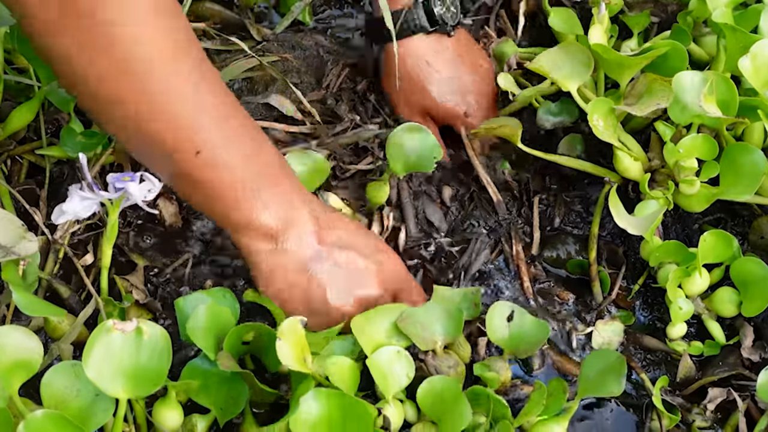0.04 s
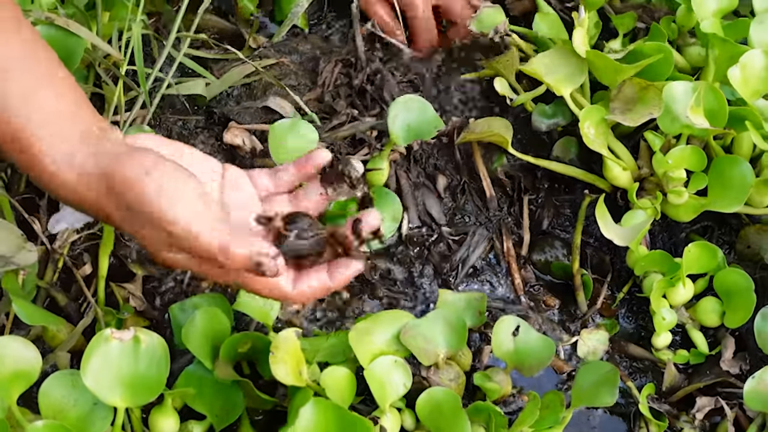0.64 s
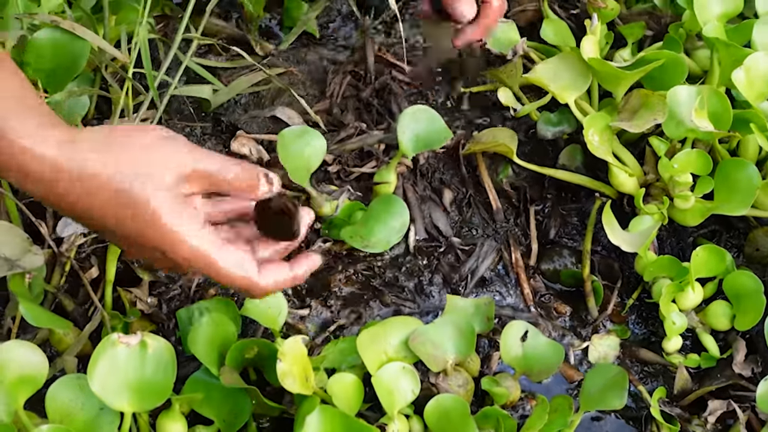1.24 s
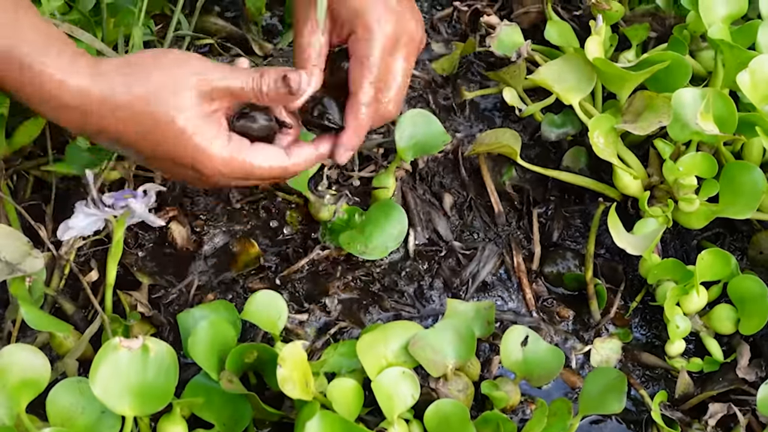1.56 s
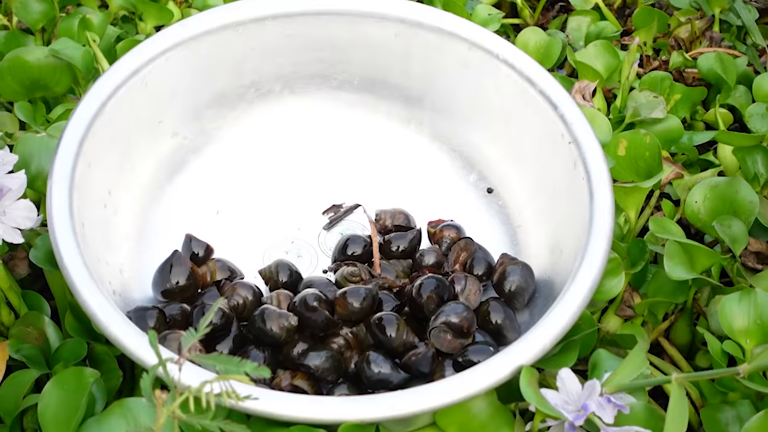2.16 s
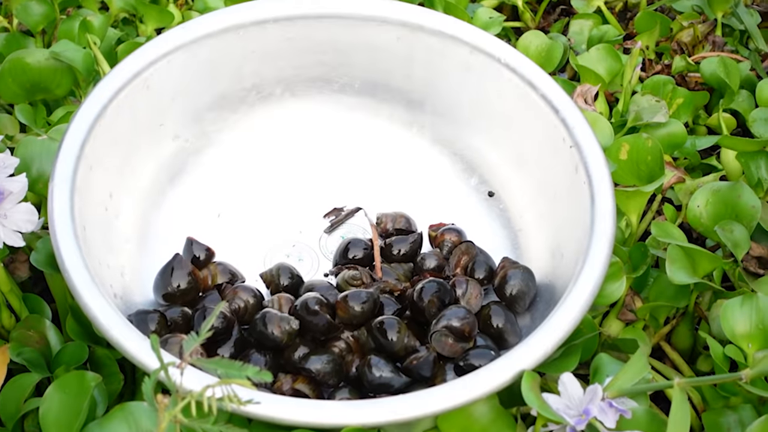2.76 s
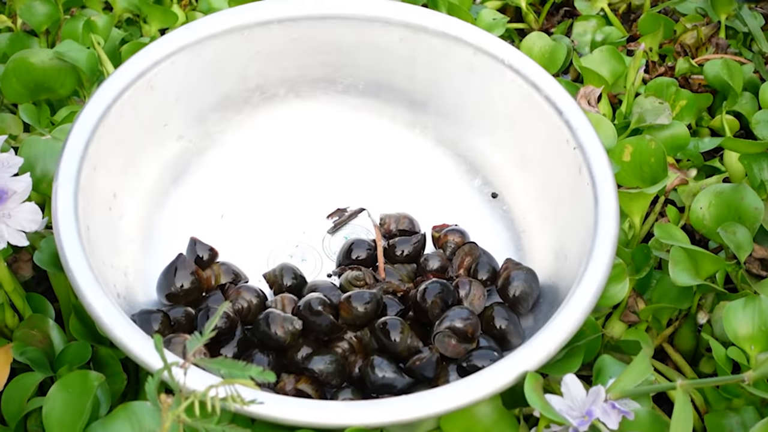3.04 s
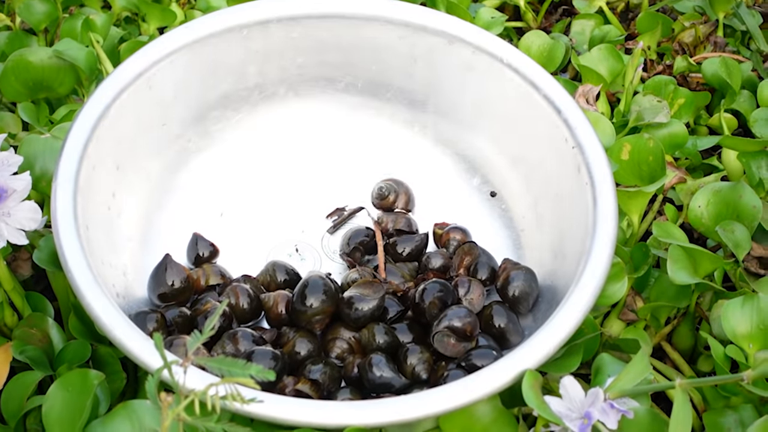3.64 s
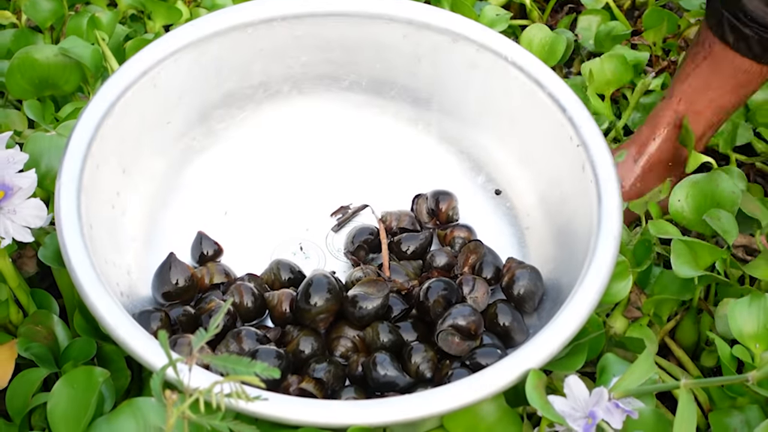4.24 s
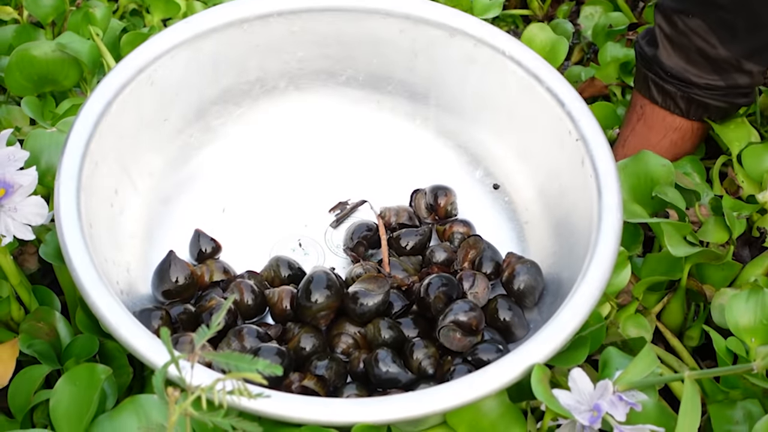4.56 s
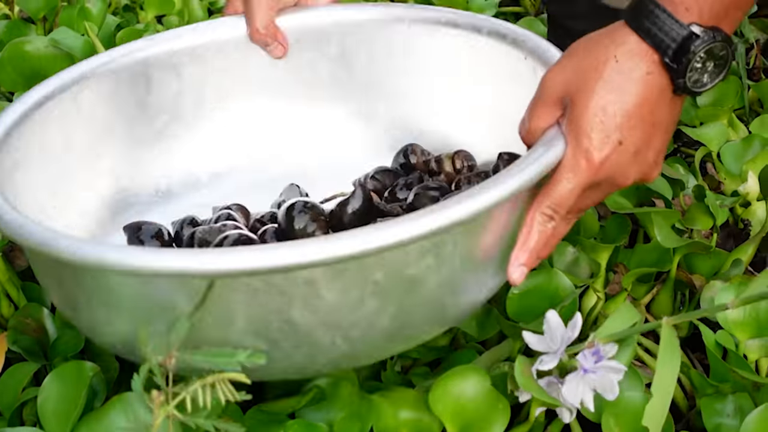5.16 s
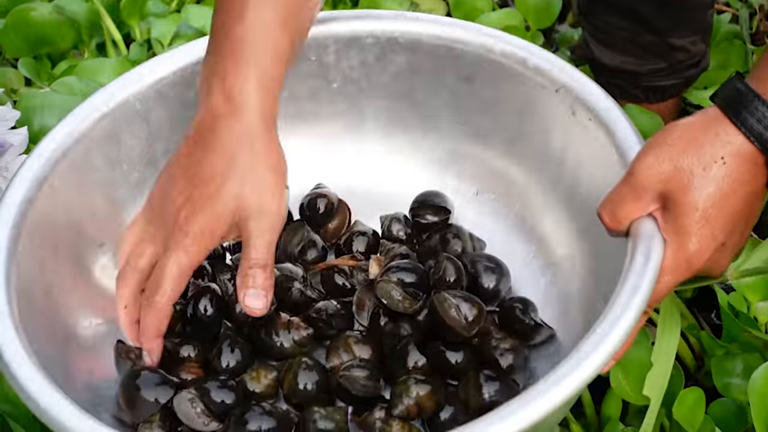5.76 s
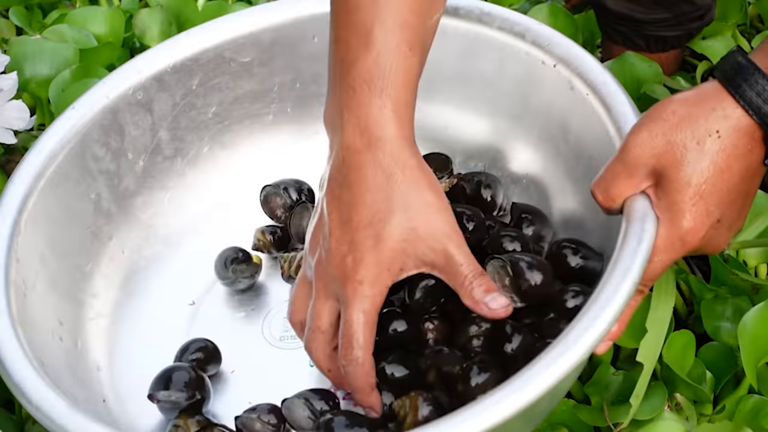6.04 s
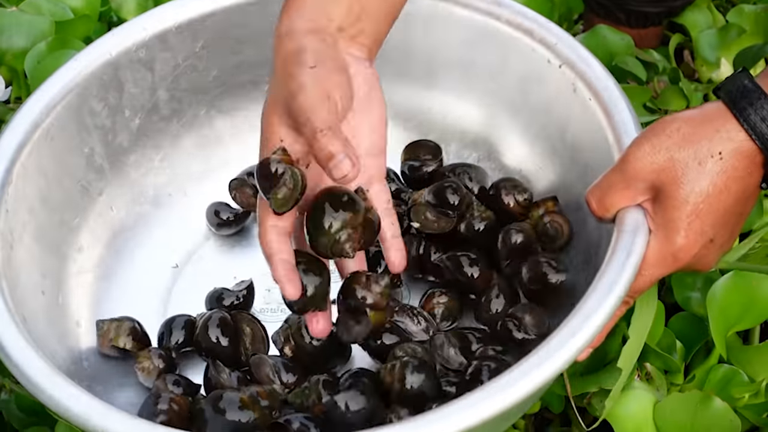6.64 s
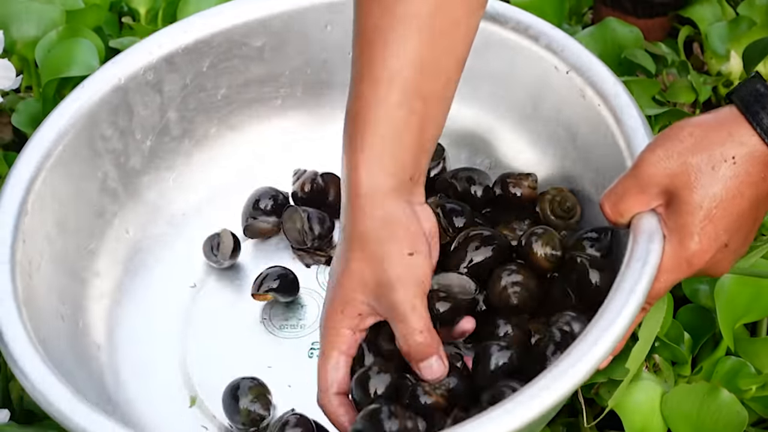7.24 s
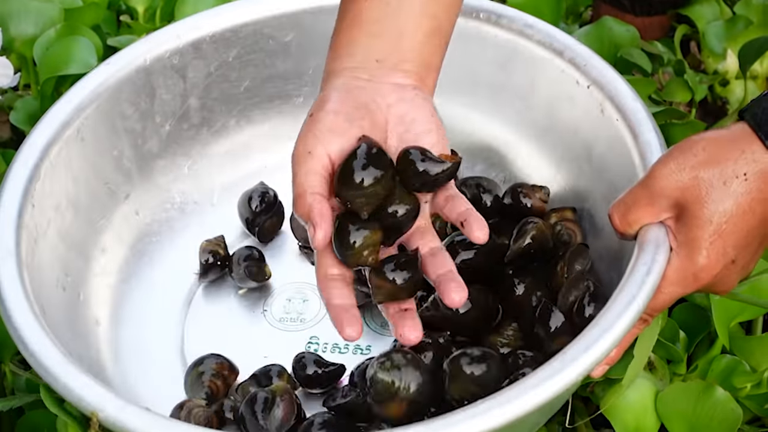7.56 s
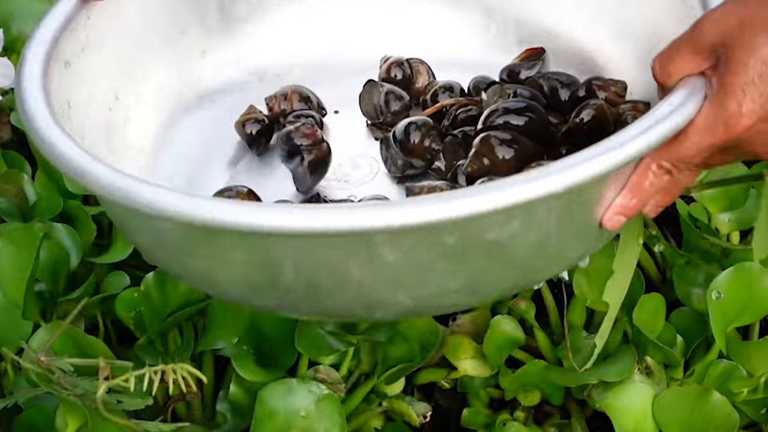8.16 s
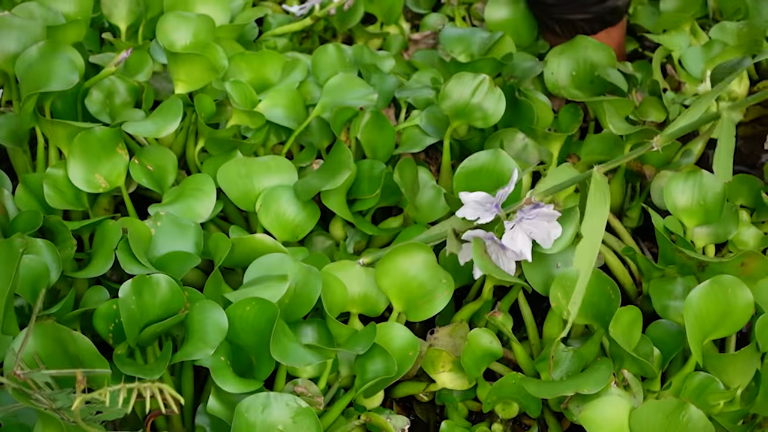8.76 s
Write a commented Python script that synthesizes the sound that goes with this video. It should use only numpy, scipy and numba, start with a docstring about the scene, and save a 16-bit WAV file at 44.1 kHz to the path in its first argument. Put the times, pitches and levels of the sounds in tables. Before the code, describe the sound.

Outdoors, fingers dig softly through wet mud with small squelches and pops while a cricket trills and a katydid buzzes. A handful of hard snail shells then drops into a metal basin, and leaves rustle. The basin is lifted, shaken and stirred by hand, making a loud, dense clatter of shells that tumble, scrape and roll on the metal. It ends with a few dull bumps. The sound is close and nearly mono.

```python
"""Snails clatter into a metal basin, which is then lifted, shaken and stirred by hand.
Each contact cracks, rings a hollow shell and knocks the damped metal; the heap tumbles, slides and rolls.
Before that, fingers pick the snails from wet mud among water plants, and small cavities pop open.
Leaves rustle, and a cricket, a katydid and an insect chorus sing behind in the open air.
The sound is close and nearly mono, with a fast limiter flattening the clatter."""
import sys
import numpy as np
from scipy import signal
from scipy.fft import rfft, irfft
from scipy.io import wavfile
from scipy.ndimage import uniform_filter1d, minimum_filter1d
from numba import njit

SR = 44100
rng = np.random.default_rng(int(sys.argv[2]) if len(sys.argv) > 2 else 0)


def int16_out(signal):
    """Quantize to a 16-bit WAV file."""
    q = np.round(np.clip(np.atleast_2d(signal).T, -1, 1) * 32767)
    wavfile.write(sys.argv[1], SR, q.astype(np.int16))


N = 387638
TIME = np.arange(N) / SR
HIT_TIME = np.arange(SR // 7) / SR  # seconds within one hit
LEAVE_MUD_S, LIFT_S = 1.87, 4.9  # the digging ends; the basin comes off the ground

# The tone of a shell strike. Each row: frequency in Hz, gain in dB.
SHELL_COLOUR = [(80, -44), (190, -15.5), (323, -3.8), (527, -5.5), (718, -3.8), (917, -7), (1090, -3.2),
                (1430, -4.5), (2180, 0), (3960, -2.5), (7700, -11.8), (16000, -23.5)]
# The tone of wet mud. Each row: frequency in Hz, gain in dB.
MUD_COLOUR = [(80, -60), (240, -37), (400, -36), (1070, -14), (1490, -9.5), (2120, -3), (16000, -7)]


def contact(shell_hz, ring_db, lifted, rim_db=0):
    """One blow: a chattering crack, a hollow shell and the basin, whose modes shift with spot and load."""
    # The loaded basin's modes. Each row: pitch in Hz, level in dB on the ground and lifted, t60 in seconds.
    basin_modes = [(371, -22, -23.5, .09), (708, -18, -18.3, .029), (1090, -20.5, -18, .042),
                   (1480, -21, -25, .03), (1760, -22, -20.5, 0.025), (2050, -26, -20, .04),
                   (2310, -20.5, -22.5, 0.059), (2680, -25, -23, 0.048), (3850, -23, -23.5, 0.08)]
    # The rim's modes, which ring on once the basin is lifted. Each row: pitch in Hz, level in dB.
    rim_modes = [(1115, -28), (1432, -32), (1560, -32), (1707, -30), (2003, -28), (2266, -33), (2536, -31)]
    spot, load = rng.standard_normal((2, len(basin_modes)))
    weights = rng.choice([-1, 1], len(basin_modes)) * undb(2.5 * spot)
    tunings = 1.04 + .03 * load if lifted else 1 + .014 * load  # lifting raises the modes
    basin = sum(weight * undb(lifted_db if lifted else ground_db) * ring(hz * tuning, t60)
                for weight, tuning, (hz, ground_db, lifted_db, t60) in zip(weights, tunings, basin_modes))
    boom = undb(-17.5) * ring(rng.uniform(260, 500), t60=.05)  # off the ground the bottom swings freely
    rim = sum(rng.choice([-1, 1]) * undb(db + rim_db)
              * ring(hz * (1 + .022 * rng.standard_normal()), t60=.35) for hz, db in rim_modes)
    chatter = 1 + .9 * np.exp(-((HIT_TIME - rng.uniform(.003, .0089)) / .0018) ** 2)  # a second touch
    hard = undb(-7.5) * crack(t60=.0031) + undb(-1.5) * chatter * crack(t60=.035)
    hard += undb(-10.5) * crack(t60=.19)
    hollow = undb(ring_db) * ring(shell_hz, t60=.032)
    ping = undb(-15) * ring(rng.uniform(3827, 9500), t60=.03)  # the thin shell wall
    onset = 1 - np.exp(-HIT_TIME / .0004)  # a rounded shell takes a moment to bear on the metal
    return (hard + hollow + ping + basin + lifted * (boom + rim)) * onset


def knocks():
    """Single shells land, bounce and strike the wall and each other."""
    # Each row: start in seconds, relative level in dB, shell pitch in Hz, shell ring in dB,
    # brightness in dB per octave.
    strikes = [(3.297, -22, 2380, -11, 3), (3.362, -8.5, 2240, -18, 1), (3.404, -13.5, 3600, -12, -1),
               (3.434, -15, 1290, -7, -3.5), (3.446, -16, 1130, -7, 0), (3.474, -18, 2570, -17, -2),
               (3.486, -14.5, 3880, -1, -1), (3.504, -12.5, 2320, -5, 1.5), (3.52, -17, 2280, -10, -1),
               (3.557, -13, 2240, -7, -0.5), (3.601, -14.5, 2350, -0.5, -2), (3.638, -8, 1880, -17, 0.5),
               (3.682, -14, 2360, -22, 0), (3.697, -23, 2300, -12, -1), (3.71, -11.5, 2420, -15, 0.5),
               (3.734, -23, 2400, -14, 0), (3.778, -14, 3070, -22, -1.5), (3.795, -24, 2310, -10, -2),
               (3.902, -24, 2380, -9, 2), (3.921, -13, 3080, -19, -1), (3.952, -14, 4330, -17, 1.5),
               (3.963, -21, 2300, -12, -3), (3.98, -17.5, 2280, -6, -0.5), (4.126, -24, 2040, -15, -1.5),
               (4.997, -15, 2440, -14, 5), (5.014, -14, 2140, -8.5, 0), (5.042, -21, 2300, -14, 2.5),
               (5.111, -15, 2200, -3, -2), (5.116, -17, 2300, -1, -2), (5.162, -15, 2300, -7, 0),
               (5.585, -11, 2600, -12, -1.5), (5.616, -8, 3400, -12, 3), (5.638, -10, 2980, -13, 1),
               (5.657, -9, 4100, -13, 2), (5.718, -7, 4050, -11, 3.5), (5.752, -14, 2200, -14, 3),
               (5.798, -13, 2500, -15, 0), (5.817, -12.5, 2110, -10, 1), (6.184, -9, 3150, -7, 0),
               (6.222, -7, 3000, -15, 1), (6.464, -9, 3600, -14, 1.5), (6.486, -11, 1590, -12, 0),
               (6.503, -8, 3100, -14, 0), (6.536, -8, 2180, -13, 0), (6.588, -10, 3400, -15, 0),
               (6.619, -6, 2150, -13, 0), (6.629, -8, 2150, -11, 2), (6.647, -9, 2130, -10, 1),
               (6.694, -11, 800, -11, 2), (6.721, -12.5, 2790, -11, 0), (6.757, -9, 1720, -13, 2),
               (6.779, -14, 2222, -14, 2), (6.792, -6, 2490, -21, -1), (6.889, -11, 2510, -13, 2),
               (6.919, -11, 1760, -13, 0), (6.936, -11, 2140, -11, 1), (6.968, -7, 3940, -12, 5),
               (7.012, -9, 3380, -14, 0), (7.047, -11, 2280, -13, 1), (7.071, -10, 2020, -13, 1),
               (7.109, -11, 1940, -9, 0), (7.363, -9, 2040, -14, 0), (7.392, -3.5, 4008, -12, 1),
               (7.417, -6, 2165, -12, 0), (7.464, -12, 3420, -13, 0), (7.474, -7, 3500, -11, 0),
               (7.539, -4, 2000, -18, 1), (7.576, -3.5, 2480, -13, 1), (7.615, -9, 3330, -14, 1),
               (7.667, -9, 2780, -9, 1), (7.681, -8, 3865, -15, 0.5), (7.709, -15, 1905, -17, 0),
               (7.746, -14, 2044, -16, -0.5), (7.772, -23, 2600, -12, 3), (7.781, -8, 2360, -12, 0),
               (7.789, -14, 1850, -8, -1), (7.821, -8, 2330, -15, -1), (7.964, -8, 3260, -7, -0.5),
               (7.977, -5, 2700, -17, 2.5), (8.014, -13, 2660, -10, -2), (8.054, -15, 1935, -9, -1),
               (8.073, -6.5, 2270, -16, 0.5), (8.111, -19, 2300, -14, 0), (8.215, -27, 2300, -12, 0),
               (8.252, -31, 2300, -10, -2), (8.306, -16, 2330, -14.5, -0.5), (8.328, -25, 2500, -14, -0.5),
               (8.345, -33, 1650, -10, -2)]
    carry_s = 8.06  # from here the basin is held only by its edge and rings more freely
    out = np.zeros(N)
    for s, db, hz, ring_db, tilt in strikes:
        hit = contact(hz, ring_db, lifted=s > LIFT_S, rim_db=5 * (s > carry_s))
        add(out, s, undb(db) * set_energy(colour(hit, SHELL_COLOUR, tilt), ring_s=.0016))
    return out


def shells(lifted, count=90):
    """A palette of blows from shells that differ in size, hollowness and hardness."""
    hits = []
    for pitch, hollow, hardness in np.clip(rng.standard_normal((count, 3)), -2, 2):
        hz = np.clip(2650 * 2 ** (.48 * pitch), 1600, 9000)
        hit = contact(hz, ring_db=-10 + 3.5 * hollow, lifted=lifted)
        hits.append(colour(hit, SHELL_COLOUR, tilt=.096 + 1.58 * hardness))
    return hits


def heap():
    """A handful pours in; later the shells tumble, with more contacts the harder they are shaken."""
    # Falling shells, a shake or a sweep of the hand set the heap tumbling.
    # Each row: start, push length and settling time in seconds, relative level in dB.
    tumbles = [(3.42, .05, .03, -35), (3.68, .04, .06, -42), (4.905, .09, .06, -39.5), (4.99, .15, .1, -37),
               (5.152, .1, .1, -25.5), (5.23, .33, .2, -23.7), (5.835, .28, .3, -23.3),
               (6.215, .22, .3, -24.3), (6.785, .075, .06, -23), (6.96, .15, .1, -27.8),
               (7.12, .2, .1, -24.7), (7.53, 0.072, .12, -25.5), (7.825, .115, 0.06, -24),
               (8.07, .02, .025, -30), (8.13, .3, .02, -47)]
    # A handful hits the basin all at once: one row with the same columns.
    pour = (3.296, .04, .07, -27.5)
    motion = np.maximum(pushes([pour], attack_s=.002), pushes(tumbles))
    shake_rate = 160 + 480 * np.minimum(motion / undb(-23), 1.25)
    poured = impacts(rate=900, spread_db=2) * (TIME <= LIFT_S)
    shaken = impacts(shake_rate, spread_db=4.2) * (TIME > LIFT_S)
    clatter = scatter(poured, shells(lifted=False)) + scatter(shaken, shells(lifted=True))
    stirring = (TIME > 5.85) & (TIME < 7.6)
    wet = rustle(MUD_COLOUR, rate=230, spread_db=35, slide_db=-16) * stirring  # films tick between fingers
    return motion * (undb(1) * even(clatter, window_s=.045) + undb(-14) * even(wet, window_s=.19))


def sliding():
    """Shells scrape along the tilted wall and under the palm, and the basin hums with them."""
    # Each row: start, push length and settling time in seconds, level in dB.
    slides = [(5.17, .53, .06, -31), (5.755, .022, .025, -34), (5.822, .05, .05, -29), (6.3, .33, .05, -30),
              (7.02, .68, .05, -32), (7.83, .17, .04, -30)]
    # The scrape and the wall's hum. Each row: frequency in Hz, gain in dB.
    slide_colour = [(130, -34), (290, -1), (520, -4), (700, 0), (900, -8), (1150, 1), (1400, -7), (3300, 0),
                    (8000, -13), (16000, -25)]
    scrape = rustle(slide_colour, rate=900, spread_db=4, slide_db=-12)
    return pushes(slides) * even(scrape, window_s=.03)


def rolling():
    """Shells roll and skid over the bare metal: countless small taps keep the bottom ringing."""
    # Each row: start, push length and settling time in seconds, level in dB.
    rolls = [(5.23, .3, .1, -29), (5.85, .33, .06, -27), (7.155, .07, .04, -29)]
    # The bottom's bright clatter. Each row: frequency in Hz, gain in dB.
    roll_colour = [(150, -40), (560, -18), (710, -5), (900, -24), (1400, -20), (1650, -5), (2150, 0),
                   (2950, -1.5), (3600, -7), (6000, -18), (16000, -32)]
    taps = rustle(roll_colour, rate=550, spread_db=4.5, slide_db=-18)
    return pushes(rolls) * even(taps, window_s=.04)


def squelches(cavities=4):
    """A wet film gives way, and a few mud-damped cavities of like size pop open one after another."""
    # Wet clicks of mud, stems and droplets. Each row: start in seconds, relative level in dB,
    # cavity pitch in Hz, cavity ring in dB, brightness in dB per octave.
    clicks = [(0.171, -20.5, 1430, -1, -12), (0.186, -30, 1800, -6, -5), (0.264, -28, 3640, -13, -2),
              (0.381, -29, 1270, 7, -13), (0.551, -32, 1810, -1, -2), (0.573, -30, 1680, -1, -3),
              (0.647, -33, 2700, -2, -1), (0.68, -32.5, 2640, 3, -6), (0.938, -38, 3400, -4, 1),
              (1.16, -34, 2800, 9, 6), (1.201, -33, 2900, -2, -4), (1.248, -30, 2900, -3, -2),
              (1.256, -27, 2070, -1, -4), (1.264, -30, 1900, 0, -5), (1.29, -31, 2300, -3, 0),
              (1.371, -27.5, 2900, -4, -2), (1.42, -34, 3250, -3, -4), (1.468, -29, 5870, -10, -1.5),
              (1.577, -31, 7200, -6, 4), (2.634, -33, 6560, -21, 9), (2.683, -40, 3560, 6, -1),
              (2.705, -35, 2380, 1, -3), (4.799, -45, 1350, 12, -6), (8.426, -36.5, 2270, 0, -9),
              (8.487, -39, 2220, -4, -7.5)]
    onset = 1 - np.exp(-HIT_TIME / .0004)
    out = np.zeros(N)
    for s, db, hz, ring_db, tilt in clicks:
        film = (crack(t60=.003) + crack(t60=.027)) * onset
        pop = colour(film, MUD_COLOUR, tilt)
        pop /= np.linalg.norm(pop)
        for k, (detune, wait) in enumerate(rng.uniform(-1, 1, (cavities, 2))):
            cavity_hz = hz * 2 ** (.35 * detune) if k else hz
            add(pop, k * (.0018 + .0007 * wait), undb(ring_db - 3.5 * k) * bubble(cavity_hz, t60=.018))
        add(out, s, undb(db) * set_energy(pop, ring_s=.00093))
    return out


def bubble(hz, t60, rise_per_s=6):
    """A wet cavity whose ring climbs as it opens."""
    return np.sqrt(2) * fade(t60) * np.sin(2 * np.pi * hz * HIT_TIME * (1 + rise_per_s * HIT_TIME / 2))


def digging():
    """Fingers slide through wet stems, and small pockets of mud suck open under the firmer pushes."""
    # Each row: start and push length in seconds, relative level in dB.
    digs = [(-.02, 0.13, -46), (0.14, 0.34, -45), (0.587, 0.093, -46), (1.185, .1, -45.5),
            (1.352, 0.12, -50), (1.565, 0.13, -53)]
    release_s, rub_db, firm_db = .15, -61, -45.5
    hiss = rustle(MUD_COLOUR, rate=500, spread_db=4.5, slide_db=-6)
    pocket_hz = np.clip(2200 * 2 ** (.5 * rng.standard_normal(60)), 700, 7000)
    suction = scatter(impacts(rate=600, spread_db=4), [ring(hz, t60=.015) for hz in pocket_hz])
    effort = pushes([(s, length, release_s, db) for s, length, db in digs], attack_s=.028, sag_db_per_s=8)
    effort = np.maximum(effort, undb(rub_db))  # between pushes the fingers rub the shells clean
    effort *= TIME < LEAVE_MUD_S
    pull = undb(-53) * (effort / undb(firm_db)) ** 2.1  # suction grows faster than the hiss
    ticks = rustle(MUD_COLOUR, rate=260, spread_db=10, slide_db=-25)  # wet films snap
    friction = undb(1.7) * even(hiss, window_s=.083) + undb(-4) * unit(ticks)
    return effort * friction + pull * even(suction, window_s=.035)


def bumps():
    """Hand, basin and foot bump dully: brief swells of low noise."""
    # Each row: peak time in seconds, level in dB, pitch in Hz, half-width in seconds.
    thuds = [(5.842, -49, 169, 0.021), (6.27, -44.5, 189.7, 0.035), (6.361, -33, 340, 0.04),
             (7.987, -31.5, 324.6, 0.012), (8.087, -33, 328, 0.026), (8.315, -38, 333, 0.013),
             (8.663, -49.5, 407, 0.069)]
    return sum(undb(db) * swell(s, width) * band(hz, hz / 2) for s, db, hz, width in thuds)


def leaves():
    """Feet and basin brush the leaves brightly; underfoot they crush with a duller swish."""
    # Each row: peak time in seconds, level in dB, treble gain in dB, half-width in seconds.
    brushes = [(2.195, -58, -1, .082), (2.44, -59, .5, .13), (3.695, -42, -7, .025), (3.85, -43, -6, .08),
               (4.16, -51, 2, .12), (4.338, -39.5, -4, .035), (4.45, -45, -7.5, .13),
               (8.657, -48.5, -10, .05), (8.65, -57, -5, .2)]
    # The tone of the foliage. Each row: frequency in Hz, gain in dB.
    leaf_colour = [(120, -26), (200, -7.5), (509, -2), (900, -6), (2020, 0.5), (4430, -1), (7270, -3.5),
                   (16000, -13)]
    texture = even(rustle(leaf_colour, rate=400, spread_db=8, slide_db=1.5), window_s=.13)
    dull, bright = (butter(texture, 3, 3500, kind) for kind in ("lowpass", "highpass"))
    return sum(undb(db) * swell(s, width) * (dull + undb(treble_db) * bright)
               for s, db, treble_db, width in brushes)


def cricket():
    """Pairs of wing strokes, each a short whistle that falls in pitch; no two are quite alike."""
    # Each row: start and end in seconds, pitch in Hz, level in dB.
    trills = [(-.008, .25, 4850, -44), (1.081, 1.35, 4850, -45.5), (1.905, 2.02, 4870, -56),
              (2.755, 3.07, 4870, -58)]
    stroke_s, pair_s, warm_up_s = .011, .0413, .07
    t = np.arange(int(stroke_s * SR)) / SR
    out = np.zeros(N)
    for start, end, hz, db in trills:
        for s in np.arange(start, end, pair_s):
            cold = np.exp(-(s - start) / warm_up_s)  # a trill starts flat and soft, then comes up
            for lag in (0, stroke_s):
                detune, strength, fall = rng.standard_normal(3)
                glide = 1 - (.07 + .035 * fall) * (t / stroke_s - .5)
                pitch = hz * (1 - .05 * cold + .01 * detune) * glide
                stroke = np.hanning(len(t)) * np.sin(2 * np.pi * np.cumsum(pitch) / SR)
                add(out, s + lag - stroke_s / 2, stroke * undb(db - 7 * cold + 2.2 * strength))
    return out


def katydid():
    """A high buzz that throbs ten times a second, in two phrases."""
    throb = 1 + .5 * np.cos(2 * np.pi * 10 * (TIME - 2.83))
    phrases = undb(-59) * (TIME < .7) + undb(-63.5) * ((TIME > 1.91) & (TIME < 2.955))
    return phrases * throb * band(9130, width_hz=610)


def outdoors():
    """Moving air and a distant insect chorus, louder at the mud bank than in the field by the basin."""
    # The air over the mud and over the field. Each row: frequency in Hz, gain in dB.
    mud_air = [(30, -21), (161, 2), (449, -7), (937, -7), (2010, -17.5), (3220, -11.5), (3770, -14.5),
               (6900, -9), (11400, -11), (16000, -34.5)]
    field_air = [(30, -43), (59, -6.5), (385, -10.5), (582, -12), (1200, -18.5), (1590, -16.5),
                 (5500, -24.5), (7150, -65), (12100, -120)]
    # The chorus. Each row: centre and width in Hz, level in dB at the mud and in the field.
    insects = [(5120, 300, -69, -72.5), (6730, 590, -82, -67), (7130, 810, -62, -86),
               (11350, 450, -61.5, -78), (11650, 500, -72, -71)]
    at_mud = TIME < LEAVE_MUD_S
    mud = undb(-54) * unit(colour(rng.standard_normal(N), mud_air))
    field = undb(-68) * unit(colour(rng.standard_normal(N), field_air))
    field += undb(-67) * band(8100, width_hz=9900)
    chorus = sum(undb(np.where(at_mud, mud_db, field_db) + .78 * walk(rate=20)) * band(hz, width)
                 for hz, width, mud_db, field_db in insects)
    return np.where(at_mud, mud, field) * undb(.31 * walk(rate=12)) + chorus


def rustle(points, rate, spread_db, slide_db):
    """Tiny slips, rate a second, over a smooth sliding hiss, coloured by (Hz, dB) points."""
    slip_power = signal.oaconvolve(impacts(rate, spread_db) ** 2, fade(t60=.008))[:N]
    envelope = unit(np.sqrt(np.abs(slip_power))) + undb(slide_db)
    return colour(rng.standard_normal(N) * envelope, points)


def impacts(rate, spread_db):
    """Randomly timed impulses of scattered strength, rate a second on average."""
    return (rng.random(N) < rate / SR) * undb(spread_db * np.clip(rng.standard_normal(N), -2, 2))


def scatter(impulses, sounds):
    """Each impulse sets off one of the sounds, picked by chance."""
    out = np.zeros(N)
    for i in np.flatnonzero(impulses):
        add(out, i / SR, impulses[i] * sounds[rng.integers(len(sounds))])
    return out


def ring(hz, t60):
    """One struck mode holding unit energy."""
    return np.sqrt(2) * fade(t60) * np.sin(2 * np.pi * hz * HIT_TIME)


def crack(t60):
    """Countless close modes dying together."""
    return fade(t60) * rng.standard_normal(len(HIT_TIME))


def fade(t60):
    """Exponential decay holding unit energy, down 60 dB after t60 seconds."""
    shape = np.exp(-np.log(1000) * HIT_TIME / t60)
    return shape / np.linalg.norm(shape)


def pushes(rows, attack_s=.026, sag_db_per_s=4):
    """Envelope of pushes: each rises, sags while it lasts and dies away; the strongest leads."""
    out = np.zeros(N)
    for start, length, release_s, db in rows:
        age = np.maximum(TIME - start, 0)
        rise = np.minimum(age / attack_s, 1)
        fall = np.exp(-np.maximum(age - length, 0) / release_s)
        out = np.maximum(out, rise * fall * undb(db - sag_db_per_s * age))
    return out


def swell(s, half_width_s):
    """A smooth rise and fall around time s."""
    return np.exp(-((TIME - s) / half_width_s) ** 2)


def walk(rate):
    """Random drift with a spread near 1, turning rate times a second."""
    points = rng.standard_normal(int(N / SR * rate) + 2)
    return np.interp(TIME * rate, np.arange(len(points)), points)


def band(hz, width_hz):
    """Noise in one resonance, rms 1."""
    edges = np.clip([hz - width_hz / 2, hz + width_hz / 2], 20, SR / 2 - 100)
    return unit(butter(rng.standard_normal(N), 2, edges, "bandpass"))


def butter(x, order, hz, kind):
    """Filter with a flat passband."""
    return signal.sosfilt(signal.butter(order, hz, kind, fs=SR, output="sos"), x)


def colour(x, points, tilt=0):
    """Causal EQ through (Hz, dB) points, tilted by dB per octave about 2.5 kHz."""
    size = 2048
    hz, db = np.transpose(points)
    octave = np.log2(np.maximum(np.arange(size // 2 + 1), .5) * SR / size)
    gain_db = np.interp(octave, np.log2(hz), db) + tilt * np.maximum(octave - np.log2(2500), -2)
    cepstrum = irfft(np.log(undb(gain_db)))
    cepstrum[1:size // 2] *= 2  # minimum phase keeps the attacks sharp
    cepstrum[size // 2 + 1:] = 0
    return signal.oaconvolve(x, irfft(np.exp(rfft(cepstrum))))[:len(x)]


def even(x, window_s):
    """Even out a texture's slow swells, to rms near 1."""
    y = unit(x)
    return y / np.sqrt(uniform_filter1d(y ** 2, int(window_s * SR) + 1) + .011)


def set_energy(hit, ring_s):
    """Scale a hit to the energy of a full-scale sound lasting ring_s."""
    return hit * np.sqrt(ring_s * SR) / np.linalg.norm(hit)


def unit(x):
    """Scale to rms 1."""
    return x / np.sqrt(np.mean(x ** 2) + 1e-18)


def undb(db):
    """Decibels to gain."""
    return 10 ** (np.asarray(db) / 20)


def add(track, s, sound):
    """Mix a sound into a track at time s."""
    start = max(int(s * SR), 0)
    track[start:start + len(sound)] += sound[:max(len(track) - start, 0)]


@njit
def peak_follower(x, release):
    """Jumps to each peak and falls back exponentially."""
    out, held = np.empty(len(x)), 0.
    for i in range(len(x)):
        held = max(x[i], held * release)
        out[i] = held
    return out


def scene():
    """Near sounds sit in the centre with a faint, bright stereo spread; air and chorus are wide."""
    # The tone of the stereo spread. Each row: frequency in Hz, gain in dB.
    spread_colour = [(300, -38), (2000, -40), (5000, -27), (15000, -28)]
    near = undb(-3) * knocks() + heap() + sliding() + rolling()
    near = near + squelches() + bumps() + digging() + leaves()
    mid = near + cricket() + katydid() + outdoors()
    side = undb(-6) * outdoors() + undb(-13) * katydid()
    spread = colour(signal.oaconvolve(near, crack(t60=.03))[:N], spread_colour)
    add(side, s=.004, sound=spread)
    return np.array([mid + side, mid - side])


def record(dry):
    """A fast look-ahead limiter holds the peaks down; the rumble is thinned and the top is cut steeply."""
    ceiling_db, release_s, top_hz = -12, .008, 15800
    peaks = peak_follower(np.abs(dry[0]), np.exp(-1 / (release_s * SR)))
    gain = np.minimum(1, undb(ceiling_db) / (peaks + 1e-9))
    gain = uniform_filter1d(minimum_filter1d(gain, size=33), size=33)  # ducks just ahead of each peak
    thinned = butter(dry * gain, 1, 70, "highpass")
    return signal.sosfilt(signal.ellip(10, .2, 70, top_hz, fs=SR, output="sos"), thinned)


dry = scene()
out = record(dry)
int16_out(out)
```